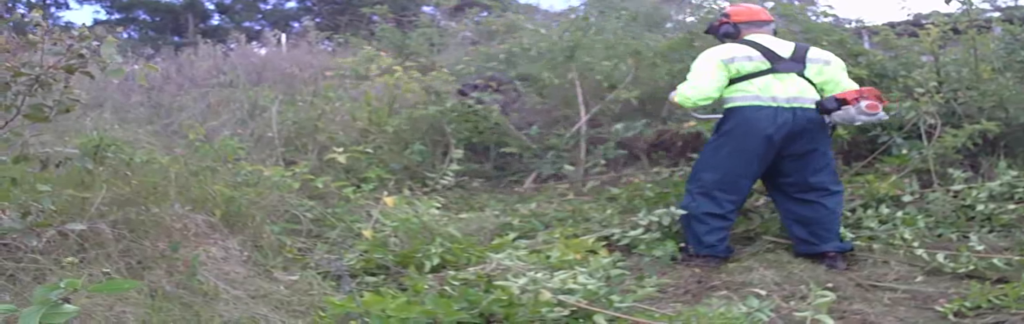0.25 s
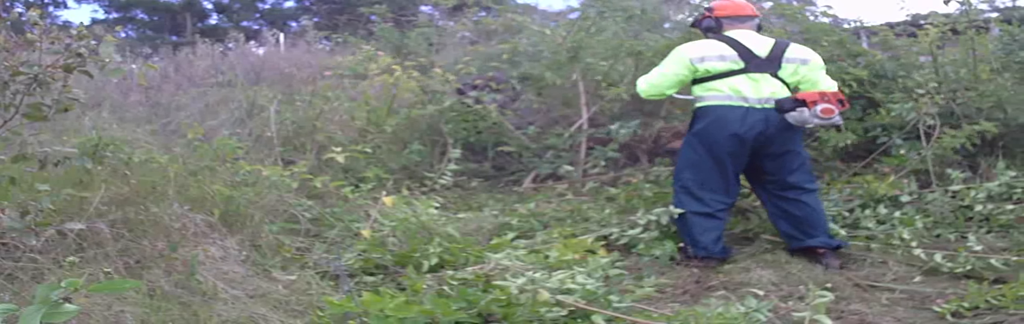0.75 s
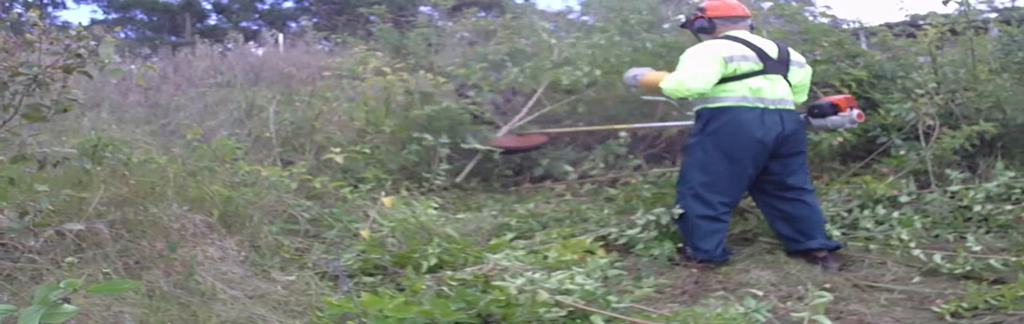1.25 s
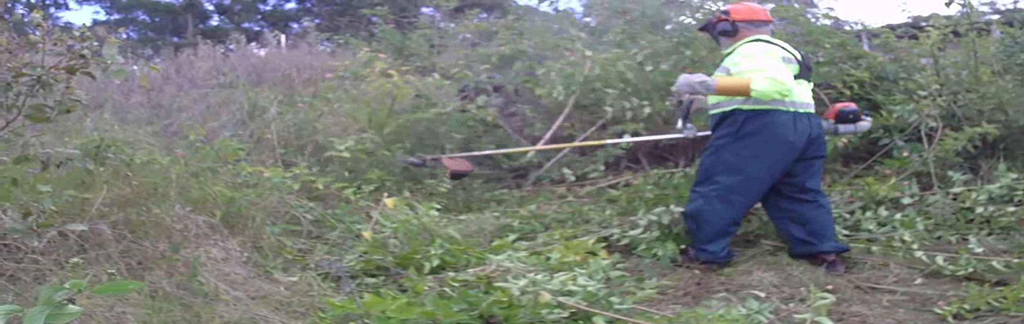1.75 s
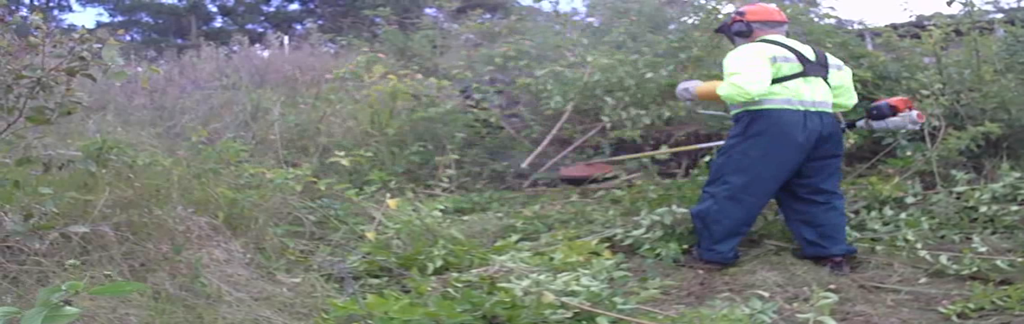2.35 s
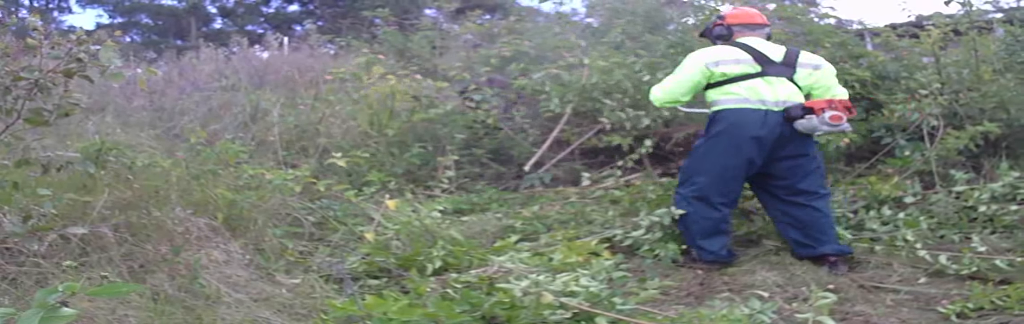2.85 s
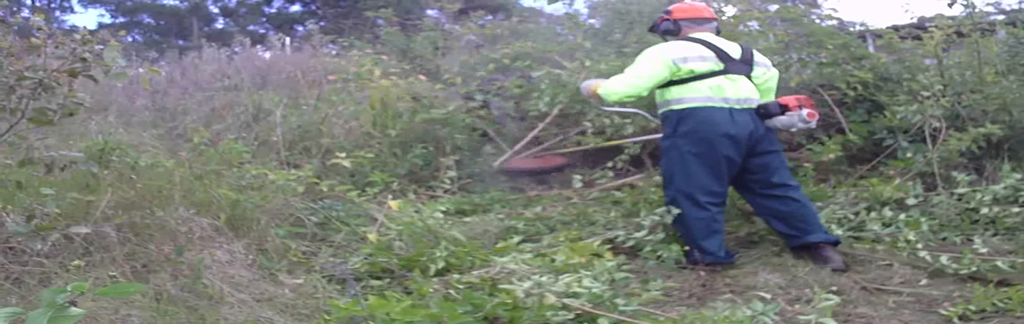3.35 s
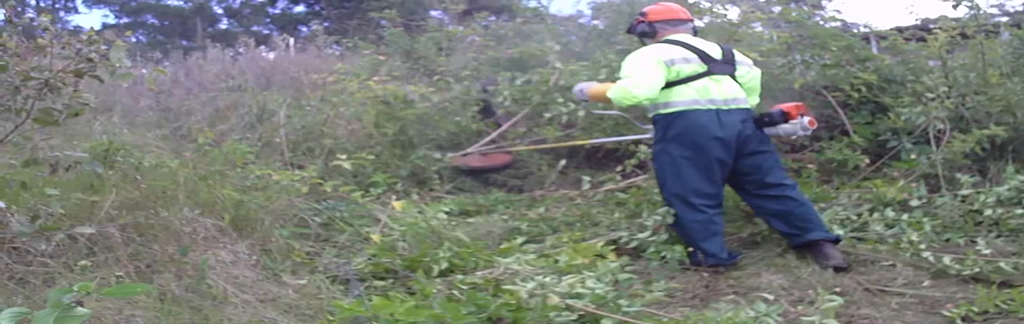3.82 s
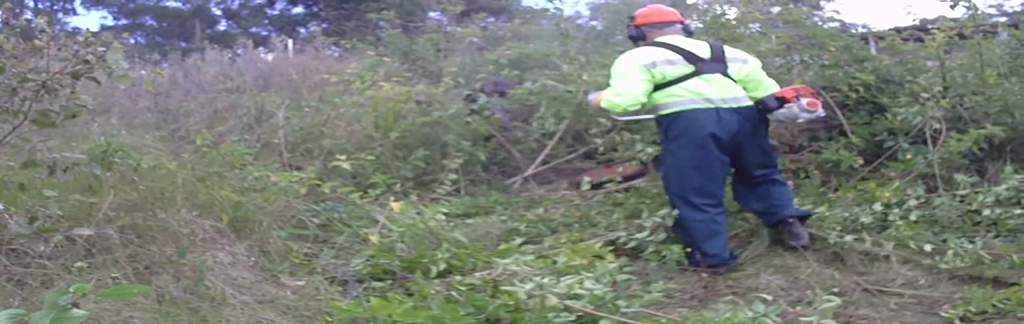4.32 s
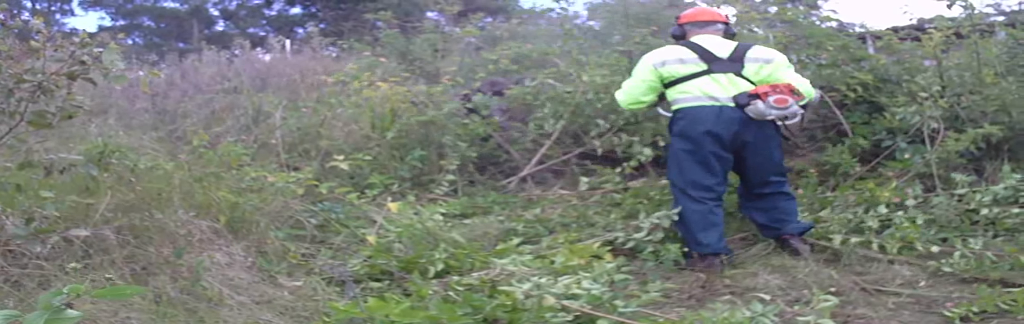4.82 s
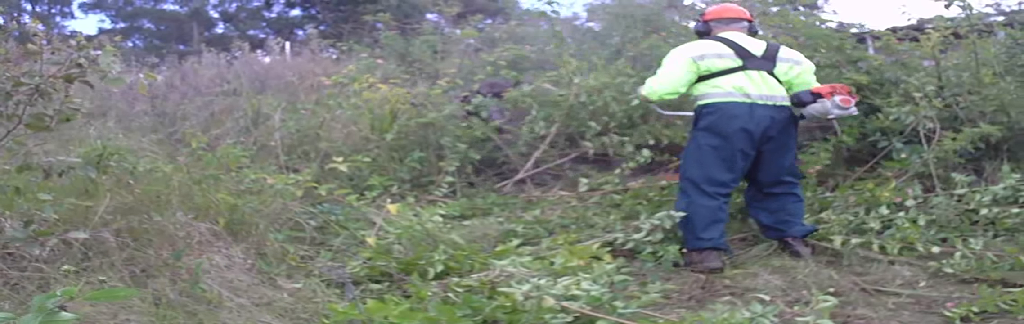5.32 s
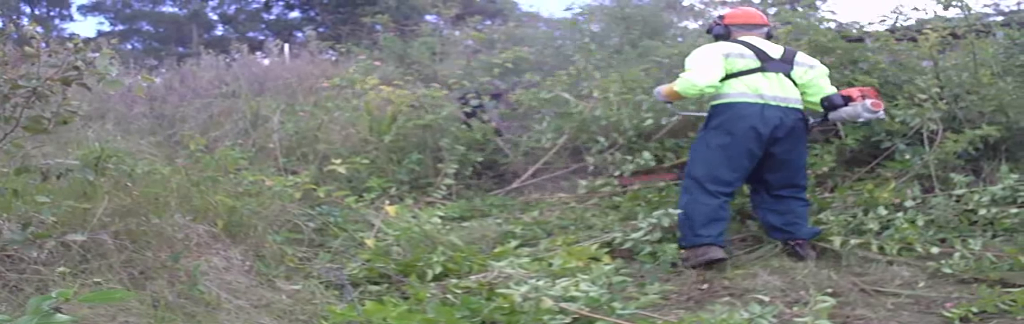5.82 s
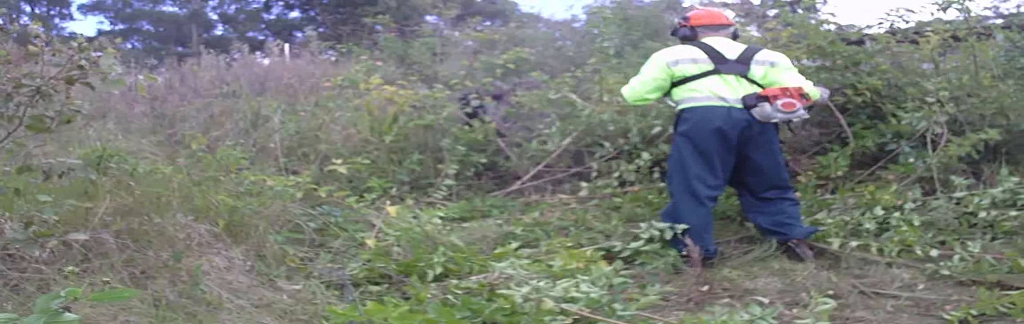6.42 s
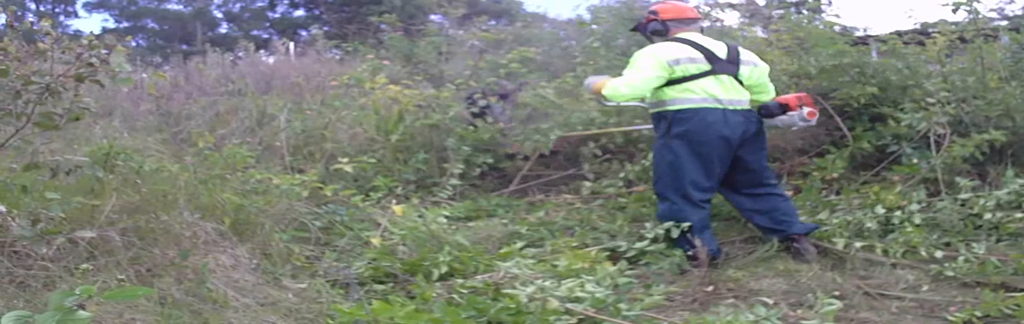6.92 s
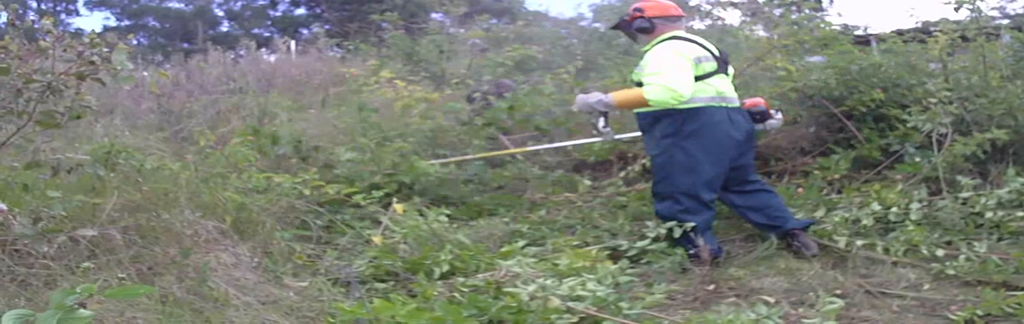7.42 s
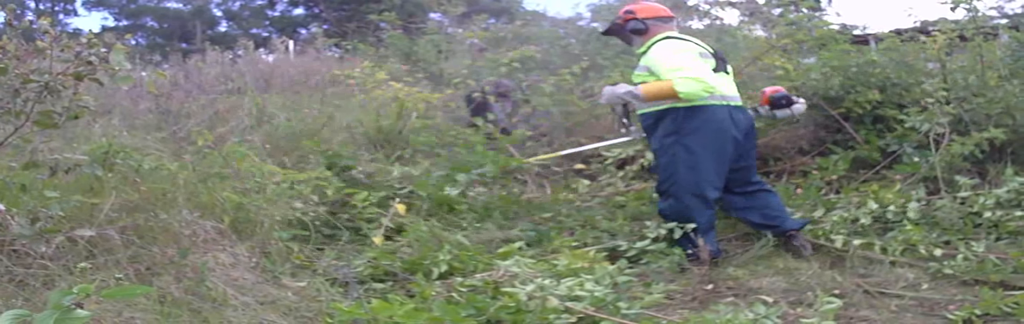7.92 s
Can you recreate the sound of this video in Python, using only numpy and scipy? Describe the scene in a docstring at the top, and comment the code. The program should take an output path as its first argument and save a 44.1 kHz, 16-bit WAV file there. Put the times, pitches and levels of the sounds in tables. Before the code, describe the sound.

A petrol grass and brush cutter drones and rasps without pause, brighter and more buzzing as its exhaust swings toward the listener, duller as it turns away. Stems crack early on, woody clumps crunch in short chopped bursts, and the engine labours hardest in the second half before recovering to a fluttering top speed. Open air with very faint background, a dry mono camcorder pickup with slightly squashed peaks.

```python
"""A four-stroke petrol brushcutter works through long grass and brush a few metres away, in faint outdoor air.
It picks up from a sag with a howling outlet as stems snap, reaches the rev limiter and sputters, and swings
away and back; a brief bite pulls the speed down near 3.4 s, a long one tears wood and drags it lowest at 5-6 s.
It howls as it recovers, bites once more near 6.7 s and ends at the limiter. Pulses locked to the crank make
the exhaust note and casing buzz; shaped noise makes gas rasp, clatter, cut grass, torn wood and air."""
import sys
import numpy as np
from scipy import signal
from scipy.fft import rfft, irfft
from scipy.io import wavfile
from scipy.ndimage import uniform_filter1d

SR = 44100
rng = np.random.default_rng(int(sys.argv[2]) if len(sys.argv) > 2 else 0)


def persist_wave(psi):
    """Save psi, clipped to +-1, as 16-bit WAV."""
    counts = np.round(np.clip(psi, -1, 1) * 32767).astype(np.int16)
    wavfile.write(sys.argv[1], SR, np.atleast_2d(counts).T)


N = 360297
T = np.arange(N) / SR


def undb(db):
    """Decibels to gain."""
    return 10 ** (np.asarray(db) / 20)


def unit(x):
    """Scale to rms 1."""
    return x / np.sqrt(np.mean(x ** 2))


def curve(table):
    """Join (time [s], value) rows by straight lines."""
    time_s, value = np.transpose(table)
    return np.interp(T, time_s, value)


def causal(log_gain):
    """Minimum-phase response: starts at once and rings out with the given gains."""
    cepstrum = irfft(log_gain)
    half = len(cepstrum) // 2
    cepstrum[1:half] *= 2
    cepstrum[half + 1:] = 0
    return irfft(np.exp(rfft(cepstrum)))


def colour(x, points):
    """Filter by a spectrum of (frequency [Hz], level [dB]) points; rms 1."""
    hz, db = np.transpose(points)
    grid_hz = np.fft.rfftfreq(4096, 1 / SR)
    level_db = np.interp(np.log(grid_hz + 1), np.log(hz), db)
    response = causal(np.log(undb(level_db)))
    return unit(signal.fftconvolve(x, response)[:N])


def resonate(x, hz, width_hz):
    """One resonance; rms 1."""
    return unit(signal.lfilter(*signal.iirpeak(hz, hz / width_hz, fs=SR), x))


def ring(x, modes):
    """Parallel resonances of (frequency [Hz], width [Hz], gain [dB]); rms 1."""
    out = 0
    for hz, width_hz, db in modes:
        out = out + undb(db) * signal.lfilter(*signal.iirpeak(hz, hz / width_hz, fs=SR), x)
    return unit(out)


def walk(rate_hz):
    """Random wander of rms 1 with rate_hz new targets a second, joined by straight lines."""
    return unit(np.interp(T * rate_hz, np.arange(N), rng.standard_normal(N)))


def grains(spread_db):
    """Dense tiny cracks, a few much larger than the rest."""
    size = undb(spread_db * np.minimum(rng.exponential(size=N), 7))
    return rng.standard_normal(N) * size


def puffs(cycle, depth_db, crank_db, scatter_db, lag):
    """Noise envelope pulsing once a firing and once a crank turn, each swell of random size; lag in cycles."""
    angle = 2 * np.pi * (cycle - lag)
    size = rng.standard_normal(N)[np.floor(cycle - lag + 1.5).astype(int)]
    swell = (1 + np.cos(angle)) / 2
    level_db = depth_db * np.cos(angle) + crank_db * np.cos(2 * angle)
    return unit(undb(level_db + scatter_db * size * swell))


def kicks(cycle):
    """One sharp, rounded kick at the start of each cycle, local mean removed."""
    since_samples = ((cycle + .5) % 1 - .5) / np.gradient(cycle)
    kick = np.exp(-(since_samples / 2) ** 2)
    return kick - uniform_filter1d(kick, size=4096)


def dips():
    """Gain that falls within milliseconds and creeps back; the deepest dip in progress counts."""
    # brief level dips: (time [s], depth [dB])
    dip_rows = [(0.253, 4.5), (1.125, 2), (1.215, 3.5), (2.137, 3.5), (2.57, 4), (2.95, 2.5), (3.31, 1.5),
                (3.349, 7), (4.29, 5.5), (5.005, 2.2), (5.11, 1.5), (5.47, 1.5), (7.38, 4), (7.725, 4),
                (7.97, 2)]
    fall_s, recovery_s_per_db = 0.0025, 0.04
    down_db = 0
    for start_s, depth_db in dip_rows:
        back = np.clip((T - start_s) / (recovery_s_per_db * depth_db), 0, 1)
        fall = np.clip((T - start_s) / fall_s, 0, 1)
        down_db = np.maximum(down_db, depth_db * fall * (1 - back ** 2))
    return undb(-down_db)


def outdoor_air():
    """Steady outdoor air: noise weighted to the lows."""
    # air spectrum: (frequency [Hz], level [dB])
    spectrum = [(20, -10), (60, -11), (150, -10.5), (400, -30), (2000, -29)]
    return colour(rng.standard_normal(N), spectrum)


def grass():
    """Cut grass: dense fine cracks give a bright hiss."""
    # cut-grass spectrum: (frequency [Hz], level [dB])
    spectrum = [(300, -45), (3000, -25), (6500, -27), (8500, -2.5), (10500, -6), (12300, -3.5),
                (14000, -10), (15600, -19)]
    return colour(grains(spread_db=2.5), spectrum)


def brush(cycle):
    """Woody clumps tear in chopped bursts and their branches ring; single stems snap."""
    # blade in a clump: (centre [s], half-length to 1/e [s], relative tearing [dB], branch ringing [dB])
    bites = [(0.205, 0.03, -26, -49), (1.102, 0.018, -26, -17), (1.365, 0.032, -12, -32),
             (2.121, 0.013, -6, -20), (2.525, 0.013, -13, -31), (5.088, 0.019, -18, -24),
             (5.193, 0.018, -11, -22), (5.257, 0.042, -36, -25.5), (5.313, .018, -20, -20.5),
             (5.441, 0.035, -15, -21), (5.808, 0.021, -17, -18.5), (6.728, 0.07, -14, -34),
             (7.6, .07, -25, -29), (7.9, .05, -25, -30)]
    # stem snaps: (time [s], relative level [dB])
    stems = [(0.0178, 9), (0.09, 4), (0.232, 3), (0.289, 1), (0.3155, 5), (1.097, 7), (1.2055, 4),
             (2.4154, 2), (2.5934, 2), (3.21, 6), (5.3163, 4), (7.379, 1)]
    # torn-wood spectrum: (frequency [Hz], level [dB])
    wood_spectrum = [(250, -47), (700, -20), (1300, -41), (3000, -8.5), (5000, -4), (9500, -5),
                     (15000, -29)]
    # struck-branch resonances: (frequency [Hz], width [Hz], gain [dB])
    branch_modes = [(795, 73, -3), (1120, 100, 6.5), (1320, 60, 4), (1580, 70, 4), (2530, 1300, -6)]
    tear_level, branch_level = 0, 0
    for centre_s, length_s, tear_db, branch_db in bites:
        contact = np.exp(-((T - centre_s) / length_s) ** 2)
        tear_level = tear_level + undb(tear_db) * contact
        branch_level = branch_level + undb(branch_db) * contact
    chops = grains(spread_db=3.5) * puffs(cycle, depth_db=-4, crank_db=4.5, scatter_db=3.5, lag=0.14)
    tearing = undb(-6.5) * tear_level * colour(chops, wood_spectrum)
    branches = branch_level * ring(chops, branch_modes)

    snap_level = np.zeros(N)
    age_s = T[:1000]
    for time_s, db in stems:
        i = int(time_s * SR)
        snap_level[i:i + len(age_s)] += undb(db) * np.exp(-age_s / 0.0026)
    snaps = undb(-13.5) * snap_level * colour(rng.standard_normal(N), wood_spectrum)
    return tearing + branches + snaps


def head(cycle):
    """Each crank turn jolts the drive shaft and rings the cutting head, the power stroke most."""
    # cutting-head modes: (frequency [Hz], width [Hz], gain [dB])
    head_modes = [(3267, 79, -4), (3490, 370, -12), (2710, 590, -15.5)]
    jolts = puffs(cycle, depth_db=3.5, crank_db=3, scatter_db=1.5, lag=.3)
    return ring(rng.standard_normal(N) * jolts, head_modes)


def mechanism(cycle, load):
    """Piston, valves and clutch clatter in dense little knocks, bunched at each firing."""
    # clatter spectrum: (frequency [Hz], level [dB])
    spectrum = [(150, -59), (500, -23), (1200, -5.5), (3000, -2.5), (4400, 2.5), (5100, 2.5), (5700, 0.5),
                (6500, 2), (7300, 3), (8800, -1.5), (10200, -1.5), (11500, -9), (15500, -14)]
    swell = puffs(cycle, depth_db=1.4 + 1.8 * load, crank_db=.5, scatter_db=1.1, lag=0)
    return colour(grains(spread_db=2.5) * swell, spectrum)


def gas(cycle, load):
    """Spent gas rushes out once a firing, in harder gusts under load."""
    # gas-rush spectrum: (frequency [Hz], level [dB])
    spectrum = [(120, -21), (230, -19.5), (330, -8), (520, -7.5), (750, -1.5), (1200, 1.5), (1550, 3),
                (2100, 7), (2900, 8), (3650, 2.5), (4200, -12), (9000, -31.5)]
    swell = puffs(cycle, depth_db=1.9 + 1.2 * load, crank_db=1, scatter_db=1.1, lag=.12)
    return colour(rng.standard_normal(N) * swell, spectrum)


def casing(cycle):
    """Combustion knocks the casing and a valve shuts half a cycle later: a hard, pitched buzz."""
    # casing modes: (frequency [Hz], width [Hz], gain before tilt [dB])
    casing_modes = [(1900, 110, -27), (2470, 350, -11), (2400, 47, 10), (2620, 190, 11.5), (2835, 46, 15),
                    (3113, 46, 12), (3270, 310, 6), (3290, 220, 8.5), (3740, 160, -9)]
    delay_samples = 23  # each mode comes from its own panel, a little later than the last
    knocks = kicks(cycle - .1) + 1.25 * kicks(cycle - .6)
    panels = 0
    for k, (hz, width_hz, db) in enumerate(casing_modes):
        panels = panels + undb(db) * resonate(np.roll(knocks, delay_samples * k), hz, width_hz)
    return colour(panels, [(800, -8.5), (2200, 1.5), (3700, 20), (5000, -11.0)])


def sputter(cycle, facing):
    """At the limiter, ill-timed charges pop in the silencer and fill the gaps between harmonics."""
    # limiter spells: (start [s], end [s], pipe level [dB])
    spells = [(0.949, 1.125, -38), (1.76, 2.136, -31.5), (2.23, 2.413, -36), (2.55, 3.29, -33),
              (3.894, 4.048, -32), (4.093, 4.205, -40), (4.51, 5.152, -33), (7.33, 7.897, -38.5),
              (7.914, 8.17, -34)]
    away_hz, facing_rise_hz = 509, 208
    width_cycles = .004
    timing = rng.uniform(.1, .9, N)[cycle.astype(int)]
    pops = np.exp(-((cycle % 1 - timing) / width_cycles) ** 2)
    pops = pops - width_cycles * np.sqrt(np.pi)  # remove the mean
    chamber = resonate(resonate(pops, 342, 170), 342, 170)
    out = 0
    for start_s, end_s, pipe_db in spells:
        hz = away_hz + facing_rise_hz * np.interp((start_s + end_s) / 2, T, facing)
        gate = np.clip(np.minimum(T - start_s, end_s - T) / 0.015 + .5, 0, 1)
        pipe = resonate(resonate(pops, hz, 260), hz, 260)
        out = out + gate * (undb(pipe_db) * pipe + undb(-43.5) * chamber)
    return out


def howl(cycle, facing):
    """The open end reflects each pulse upside down and rings, loudest when it faces the listener."""
    # labouring engine picks up: (start [s], end [s], level when facing [dB])
    spells = [(0, .82, -30), (5.598, 6.2, -30)]
    # outlet resonances: (frequency [Hz], width [Hz], gain [dB])
    outlet_modes = [(1125, 60, 0), (760, 60, -15)]
    fade_s = .17  # outside each spell
    level = 0
    for start_s, end_s, db in spells:
        fade = np.clip(1 + np.minimum(T - start_s, end_s - T) / fade_s, 0, 1)
        level = level + undb(db) * fade
    return level * np.sqrt(np.abs(facing)) * ring(-kicks(cycle), outlet_modes)


def exhaust(cycle, harmonics, skirt_db):
    """One pressure pulse a firing, ringing out within the cycle; skirt in dB per harmonic outside the table."""
    order, db = np.transpose(harmonics)
    k = np.arange(513)
    outside = np.maximum(order[0] - k, 0) + np.maximum(k - order[-1], 0)
    level_db = np.maximum(np.interp(k, order, db) - skirt_db * outside, -60)
    pulse = causal(np.log(undb(level_db)))
    phase = np.linspace(0, 1, len(pulse) + 1)
    return unit(np.interp(cycle % 1, phase, np.append(pulse, pulse[0])))


def beam(facing, lobe_db, aim, width, spill_db):
    """Bell-shaped lobe over a spill in all directions; aim and width in facing, spill relative to lobe."""
    return undb(lobe_db) * (np.exp(-((facing - aim) / width) ** 2) + undb(spill_db))


def hum(cycle):
    """Lowest exhaust harmonics, spreading all round."""
    # hum harmonics: (multiple of firing rate [-], relative level [dB])
    harmonics = [(1, -23), (2, -14), (3, -19), (4, 5), (5, -4.5)]
    return exhaust(cycle, harmonics, skirt_db=22)


def drone(cycle, facing):
    """Middle exhaust harmonics, beamed to the listener when the outlet is turned away."""
    # drone harmonics: (multiple of firing rate [-], relative level [dB])
    harmonics = [(6, -1.7), (7, -0.4), (8, -10.2), (9, -5.6), (10, -2.1), (11, -5.4), (12, -1.6),
                 (13, -12.7), (14, 0.0), (15, -4.6)]
    lobe = beam(facing, lobe_db=-28, aim=0.03, width=0.43, spill_db=-31.5)
    return lobe * exhaust(cycle, harmonics, skirt_db=15.5)


def bark(cycle, facing):
    """Exhaust harmonics reaching higher, beamed to the listener when the outlet faces."""
    # bark harmonics: (multiple of firing rate [-], relative level [dB])
    harmonics = [(2, -20.6), (3, -21.4), (4, -12.2), (5, -18.4), (6, -23.1), (7, -6.4), (8, -6.7),
                 (9, -6.0), (10, -7.5), (11, -10.7), (12, -2.8), (13, -4.4), (14, -0.6), (15, -10.2),
                 (16, -3.8), (17, -6.8), (18, -12.6), (19, -16.7), (20, 0.0), (21, -9.2), (22, -10.3),
                 (23, -18.2), (24, -1.2), (25, -8.9)]
    lobe = beam(facing, lobe_db=-23.5, aim=0.96, width=0.4, spill_db=-17)
    return lobe * exhaust(cycle, harmonics, skirt_db=11.5)


def silencer(x):
    """Echoes between the baffles spread each pulse in time without colouring it (all-pass)."""
    round_trip_s, echo = .0034, 0.38
    trip = np.exp(-2j * np.pi * np.fft.rfftfreq(N, 1 / SR) * round_trip_s)
    # main pulse stays in step; a little leaks out before it, the rest trails behind
    return irfft(rfft(x) * (1 - echo / trip) / (1 - echo * trip), N)


def scene():
    """Engine, cutting head and vegetation balanced by swing and load, over faint outdoor air."""
    # engine speed, dragged down by cuts: (time [s], firing rate [Hz])
    speed = [(0.04, 74.3), (0.24, 76.15), (0.69, 83.1), (0.94, 86.36), (1.08, 85.15), (1.19, 81.4),
             (1.44, 82.7), (1.71, 85.88), (3.28, 85.6), (3.37, 80.2), (3.48, 79.7), (3.89, 85.66),
             (5.09, 85.28), (5.29, 74), (5.34, 72.2), (5.61, 69.6), (5.84, 71.15), (6.2, 80.37),
             (6.47, 84.55), (6.65, 84.8), (6.79, 82.3), (6.88, 82.1), (7.19, 85.06), (8.17, 85.77)]
    # worker's swings: (time [s], facing [0 = outlet turned away, 1 = at the listener])
    swing = [(0, 0.33), (.32, 0.58), (.5, 1), (1.06, 0.76), (1.18, 0.41), (1.6, 0.079), (2.1, .08),
             (2.5, 0.47), (2.8, 0.8), (3.28, 0.73), (3.37, .17), (3.85, 0.16), (4.3, 0.55), (4.65, 0.82),
             (5.06, 0.91), (5.2, 0.43), (5.9, 0.36), (6.15, 0.9), (6.62, 0.98), (6.8, 0.49), (7.15, .14),
             (8.17, .23)]
    free_hz, full_load_sag_hz = 87.14, 14.5
    firing_hz = curve(speed)
    facing = curve(swing)
    # cycles since the start: one firing, two crank turns each
    cycle = np.cumsum(firing_hz * (1 + .0007 * walk(40) + .0016 * walk(8))) / SR
    load = np.clip((free_hz - firing_hz) / full_load_sag_hz, 0, 1)  # the deeper the sag, the harder it labours

    def gain(base_db, facing_db, load_db):
        """Part gain: turned away and unloaded, plus rises at full facing and full load."""
        return undb(base_db + facing_db * facing + load_db * load)

    beamed = undb(-3.5 * load) * (drone(cycle, facing) + bark(cycle, facing))  # weaker under load
    note = silencer(gain(-39, 2.5, 0.2) * hum(cycle) + beamed + howl(cycle, facing))
    buzz = gain(-34, 10.5, -0.5) * casing(cycle)
    rasp = gain(-21.5, 1.5, -3.5) * undb(0.39 * walk(25)) * gas(cycle, load)
    clatter = gain(-18, -.2, 0.6) * undb(0.82 * walk(40)) * mechanism(cycle, load)
    engine = note + buzz + sputter(cycle, facing) + rasp + clatter

    head_ring = gain(-23.5, 3, -9) * undb(1.3 * walk(12)) * head(cycle)
    hiss = gain(-19.3, -4.5, -7.5) * undb(1.04 * walk(60) + 1.6 * walk(11)) * grass()
    cutting = head_ring + hiss + brush(cycle)
    air = undb(-53) * outdoor_air()
    return ((engine + cutting + air) * dips())[None]


def record(dry):
    """Mono camcorder on two equal channels: rounded peaks, three evenly spaced notches, steep top cut."""
    notch_hz, top_hz = 3950, 15700
    x = 1.1 * np.tanh(dry[0] / 1.1)
    for k, width_hz in enumerate([190, 280, 130]):
        hz = notch_hz * (k + 1)
        x = x - .92 * signal.lfilter(*signal.iirpeak(hz, hz / width_hz, fs=SR), x)
    x = signal.sosfilt(signal.ellip(10, .2, 80, top_hz, fs=SR, output="sos"), x)
    return np.array([x, x])


dry = scene()
out = record(dry)
persist_wave(out)
```